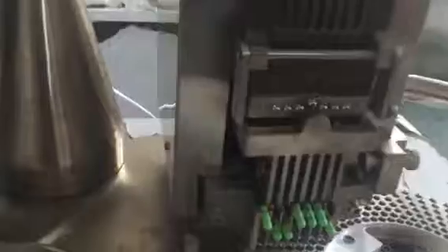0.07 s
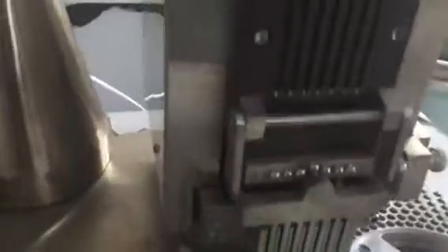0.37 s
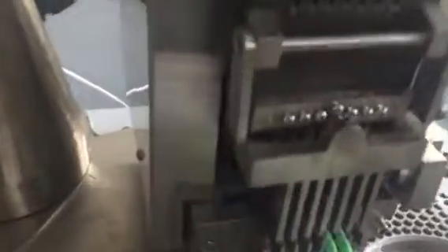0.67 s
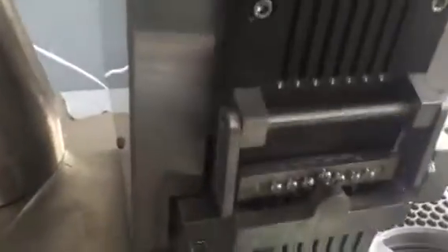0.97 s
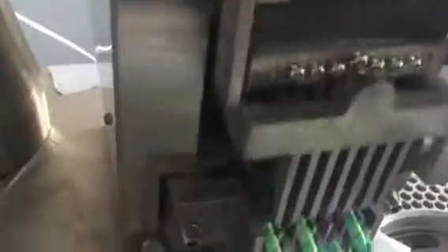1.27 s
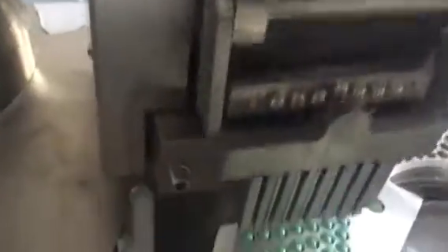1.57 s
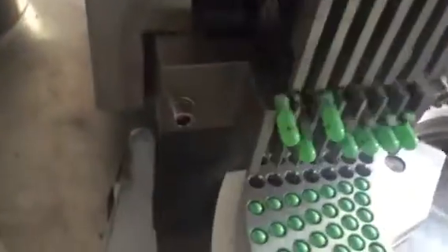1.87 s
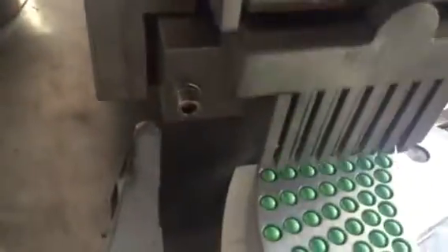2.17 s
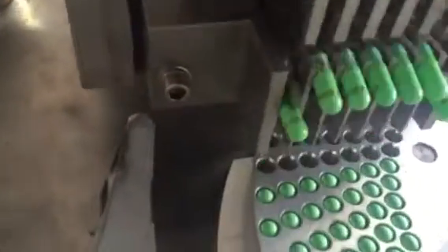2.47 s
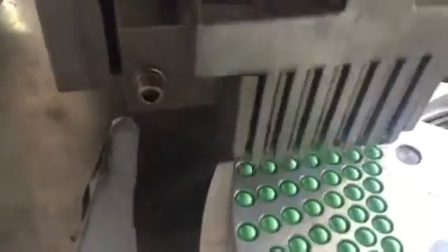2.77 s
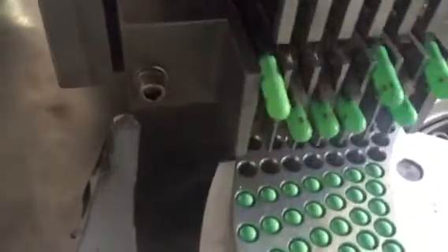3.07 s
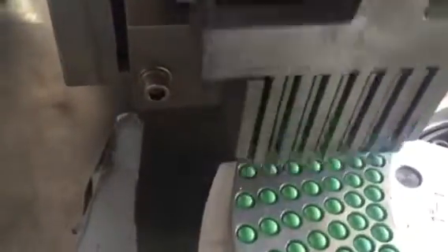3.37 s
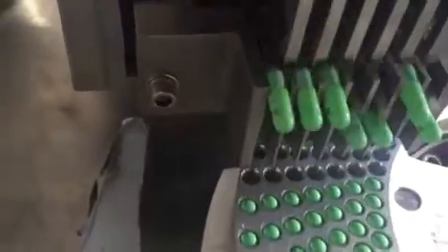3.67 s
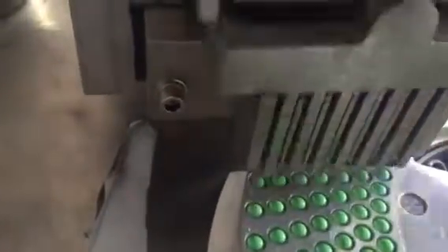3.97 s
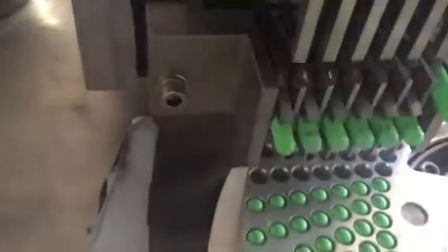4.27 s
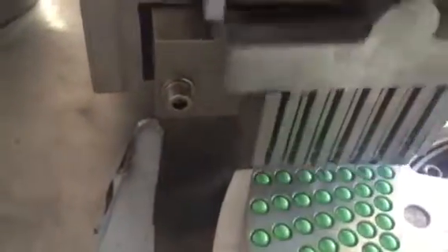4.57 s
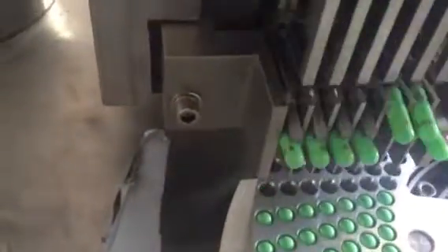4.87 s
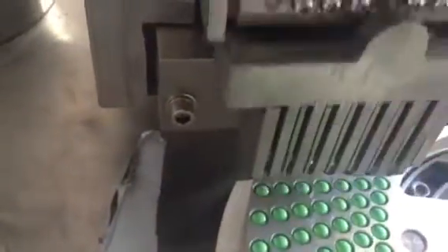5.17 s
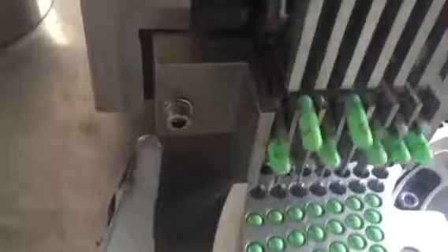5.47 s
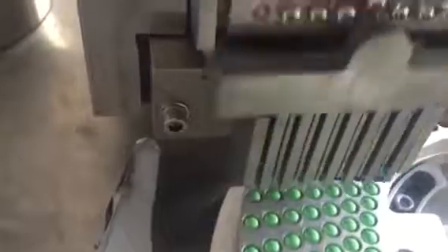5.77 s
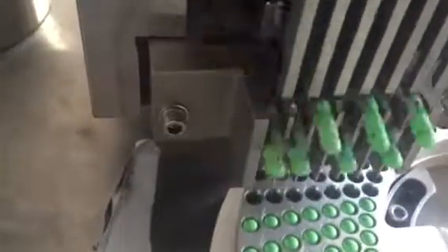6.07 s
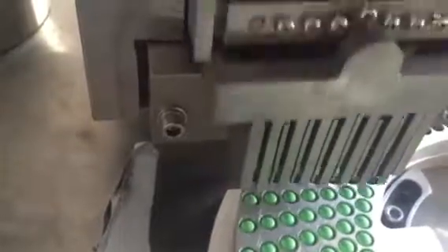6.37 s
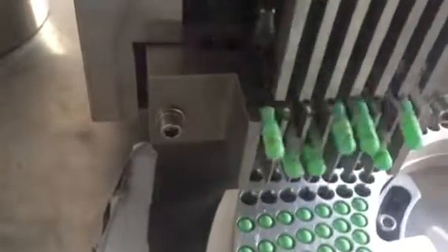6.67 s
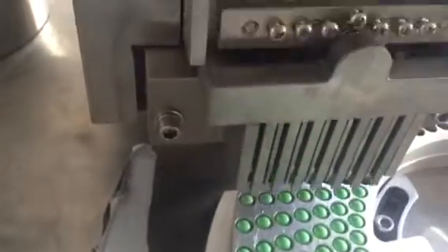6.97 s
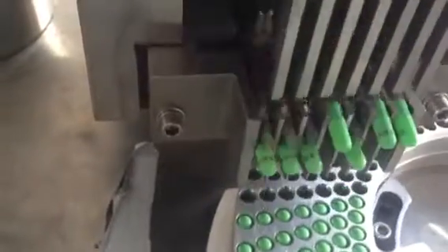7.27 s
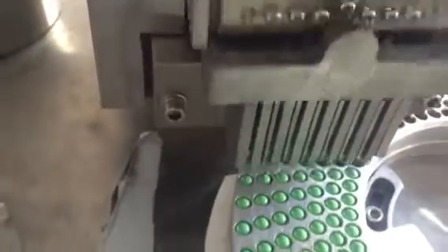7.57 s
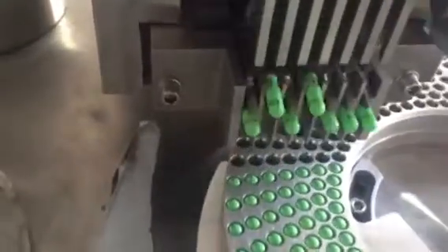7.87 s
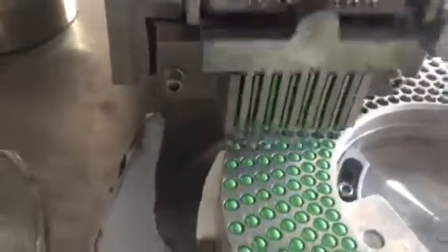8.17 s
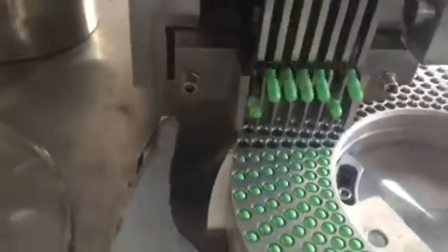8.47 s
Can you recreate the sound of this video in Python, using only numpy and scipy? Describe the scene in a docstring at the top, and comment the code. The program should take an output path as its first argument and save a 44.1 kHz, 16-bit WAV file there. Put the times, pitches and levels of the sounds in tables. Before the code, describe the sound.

Close rhythmic rushes of air, each cut off by a valve slap and steel clacks, as a capsule filling machine runs.

```python
"""Capsule filling machine

Close by in a workshop, about a hundred strokes a minute. Each stroke a vacuum valve opens with a
rush, air whistles in through the capsule plate, and the valve slaps shut with a gust that thumps
the microphone; the level often dips. The loading comb ticks, scrapes forward and clacks against its
stop. Loose capsules tap in their chutes. Underneath, the drive rumbles and the frame booms."""
import sys
import numpy as np
from scipy import signal
from scipy.fft import rfft, irfft
from scipy.io import wavfile
from scipy.ndimage import uniform_filter1d, minimum_filter1d, map_coordinates

SR = 44100
rng = np.random.default_rng(int(sys.argv[2]) if len(sys.argv) > 2 else 0)


def wav_record(signal):
    """Record a signal, one row per channel, as 16-bit PCM in the file named by sys.argv[1]."""
    frames = np.transpose(np.atleast_2d(signal))
    bounded = np.clip(frames, -1, 1)
    # unit amplitude maps onto the largest positive 16-bit level
    quanta = np.round(bounded * 32767).astype(np.int16)
    wavfile.write(sys.argv[1], SR, quanta)


N = 376613
TIME = np.arange(N) / SR


def from_db(db):
    return 10 ** (np.asarray(db) / 20)


def unit_rms(x):
    return x / np.sqrt(np.mean(x ** 2) + 1e-20)


def noise():
    return rng.standard_normal(N)


def drift(per_s):
    """Smooth random wander, spread about 1."""
    steps = rng.standard_normal(int(TIME[-1] * per_s) + 4)
    return map_coordinates(steps, [TIME[::64] * per_s + 1], order=3).repeat(64)[:N]


def hump(t, rise_s, fall_s):
    """Gaussian swell, height 1 at t = 0."""
    return np.exp(-.5 * (t / np.where(t < 0, rise_s, fall_s)) ** 2)


def bursts(starts_s, holds_s, levels_db, rise_s, fall_s):
    """Contact envelopes: rise, hold, decay."""
    out, t = np.zeros(N), TIME[:SR // 10]
    for start, hold, db in np.broadcast(starts_s, holds_s, levels_db):
        envelope = from_db(db) * (1 - np.exp(-t / rise_s)) * np.exp(-np.maximum(t - hold, 0) / fall_s)
        span = out[int(start * SR):][:len(t)]
        span += envelope[:len(span)]
    return out


def coloured(x, spectrum, size=4096):
    """Minimum-phase filter, unit power gain."""
    hz, level_db = np.transpose(spectrum)
    grid_hz = np.maximum(np.arange(size // 2 + 1) * SR / size, 1)
    gain = unit_rms(from_db(np.interp(np.log(grid_hz), np.log(hz), level_db)))
    cepstrum = irfft(np.log(gain))
    cepstrum[1:size // 2] *= 2
    cepstrum[size // 2 + 1:] = 0
    return signal.oaconvolve(x, irfft(np.exp(rfft(cepstrum))))[:N]


def resonate(x, hz, width_hz):
    """Two-pole resonance, peak gain 1."""
    r = np.exp(-np.pi * width_hz / SR)
    feedback = [1, -2 * r * np.cos(2 * np.pi * hz / SR), r * r]
    return signal.lfilter(np.array([1, 0, -1]) * (1 - r * r) / 2, feedback, x + 1e-18)


def steel_part(force, modes, vary_db, damping=0):
    """Modes ring in a drifting mix; contact damping widens each by a share of its pitch."""
    impulse = signal.unit_impulse(4096)
    out, response = 0, 0
    for k, (hz, width_hz, db) in enumerate(modes):
        gain = (-1) ** k * from_db(db)
        damped_hz = width_hz + damping * hz
        response += gain * resonate(impulse, hz, damped_hz)
        out += gain * resonate(force, hz, damped_hz) * from_db(vary_db * drift(2.056))
    return out / np.linalg.norm(response)


def grit(per_s, smooth_db):
    """Tiny random slips over smooth friction noise."""
    slips = unit_rms(noise() * (rng.random(N) < per_s / SR))
    return unit_rms(slips + from_db(smooth_db) * noise())


# Motor and pump tones: f/Hz, relative level/dB
DRIVE_TONES = [(100, -21), (128, -14.5), (195, -13), (360, -22), (507, -19), (650, -16), (1064, -21),
               (1600, -23)]
# Drive rumble: f/Hz, relative level/dB
DRIVE_SPECTRUM = [(25, -12), (60, 8.5), (110, 5.5), (190, -1), (300, -3.5), (430, -2.5), (650, 1),
                  (1000, 0.5), (1630, 5.5), (2000, 0.5), (4000, -2), (6000, -6.5), (9000, -11),
                  (15000, -17)]


def drive(gain_db=-32.5, rumble_db=-1, waver_rad=0.97):
    """Cams and pump rumble and hum, the tones wavering slightly."""
    hum = sum(from_db(db) * np.sqrt(2) * np.sin(2 * np.pi * hz * TIME + waver_rad * drift(8))
              for hz, db in DRIVE_TONES)
    rumble = from_db(rumble_db) * coloured(noise(), DRIVE_SPECTRUM)
    return from_db(gain_db) * (rumble + hum)


# Frame boom: f/Hz, relative level/dB
FRAME_SPECTRUM = [(25, -44), (55, -3.5), (85, -13.5), (135, -2.5), (175, -2), (215, -2), (330, -16),
                  (500, -20.5), (2000, -45)]
# Frame shudders: t/s, boom level/dB, lingering level/dB
FRAME_SHUDDERS = [(1.207, -19, -27.5), (4.22, -52, -35)]


def frame(dip_db, dip_ratio=4.1, steady_db=-36.5, rumble_db=-3, tone_hz=170, tone_db=-5, waver_rad=0.93):
    """The frame booms softly; each shudder swells the rumble and one unsteady low resonance."""
    swell = sum(from_db(boom_db) * hump(TIME - start, rise_s=0.024, fall_s=0.041)
                + from_db(linger_db) * hump(TIME - start, rise_s=0.024, fall_s=0.31)
                for start, boom_db, linger_db in FRAME_SHUDDERS)
    tone = np.sqrt(2) * np.sin(2 * np.pi * tone_hz * TIME + waver_rad * drift(39.9))
    rumble_gain = np.hypot(from_db(steady_db - dip_ratio * dip_db), from_db(rumble_db) * swell)
    return rumble_gain * coloured(noise(), FRAME_SPECTRUM) + from_db(tone_db) * swell * tone


# Air resonances of plate holes and duct: f/Hz, width/Hz, relative level/dB
DUCT_MODES = [(524, 240, -10.5), (715, 213, -5), (939.5, 103, 2), (1088, 106, -4.5), (1520, 960, -16),
              (1990, 374, -4), (2003, 1030, -9), (3170, 370, -3.5), (3430, 340, -3.5), (3837, 790, 1),
              (4540, 330, -5), (5255, 220, -6), (5670, 1280, -4), (6460, 690, -2), (7240, 1000, -9),
              (8270, 540, -6), (8740, 1100, -3), (9830, 800, -5.5), (10940, 650, -12.5),
              (12370, 2900, -9.5), (14200, 2400, -13), (15400, 2000, -16)]


def duct_air():
    """Turbulence excites each resonance independently."""
    return unit_rms(sum(from_db(db) * resonate(resonate(noise(), hz, width_hz), hz, width_hz)
                        for hz, width_hz, db in DUCT_MODES))


# Opening rush against steady draw: f/Hz, gain/dB
RUSH_EQ = [(100, 6), (900, -10), (1400, 0), (2000, 1), (2800, 2.5), (3900, -1), (6400, -6.5), (8800, -2.5),
           (15000, -17)]
# Duct buffeting: f/Hz, relative level/dB
BUFFET_SPECTRUM = [(25, -16), (60, 1), (90, -15), (130, -10), (200, 4.5), (250, -6.5), (320, -1),
                   (450, -7.5), (700, -21), (2000, -29)]
# Valve edge hiss: f/Hz, relative level/dB
EDGE_SPECTRUM = [(1000, -40), (4000, -39), (7000, 1.5), (8700, -12.5), (10500, -2.5), (13000, 0.5),
                 (15000, -4.5)]
# One row per cam turn: suction/dB, valve flutter/s, gust/dB, tick delay/s, scrape/dB, dip depth/dB
STROKES = [(-22, .0075, -8.5, .0485, -15, 0.3), (-21, 0.0099, -12, .050, -14, -2),
           (-20, .008, 1, .045, -15, 0.5), (-19, .0065, 14, 0.036, -13, 9.5),
           (-19.5, .0058, 1.5, 0.04, -12.5, 7.5), (-20, .0135, 10, .050, -13, 7),
           (-19, 0.00738, -6.5, .044, -13, 3.5), (-18, .0098, 8.5, .052, -13, 2),
           (-19.5, .0075, 11.5, 0.046, -12, 6.5), (-20, 0.0086, -29, .046, -14, 2.5),
           (-18, 0.0092, 9, .0507, -12, 2.5), (-19.5, 0.0073, -13, .0477, -16, 1.5),
           (-20, 0.0087, -12, .048, -16.5, 1.5), (-20, .013, 9.5, .052, -16.5, 3)]
SUCTION_DB, FLUTTER_S, GUST_DB, TICK_DELAY_S, SCRAPE_DB, DIP_DB = np.transpose(STROKES)
FIRST_SLAP_S, CYCLE_S, OPEN_S = 0.4295, 0.6066, 0.4209
SLAP_S = FIRST_SLAP_S + CYCLE_S * np.arange(len(STROKES))


def suction(rush_db=6.5, draw_db=-0.22, edge_db=-2, buffet_db=-19, leak_db=-13.5, shut_s=0.0048):
    """Stored vacuum empties in a rush, then the pump draws steadily until the valve shuts."""
    spit_at_s, draw_at_s, hiss_at_s, rush_at_s = 0.022, 0.074, 0.081, 0.082   # after opening
    draw_rise_s, tail_fall_s = 0.0088, 0.083
    rush, draw, edge = np.zeros((3, N))
    for slap, flutter, db in zip(SLAP_S, FLUTTER_S, SUCTION_DB):
        span = (TIME > slap - OPEN_S) & (TIME < slap + flutter + shut_s * 10)
        t = TIME[span] - slap + OPEN_S
        valve = from_db(db) * np.exp(-np.maximum(t - OPEN_S - flutter + shut_s, 0) / shut_s)
        opened = 1 / (1 + np.exp((draw_at_s - t) / draw_rise_s))
        leak = from_db(leak_db) * np.minimum(t / spit_at_s, 1)
        rush[span] += valve * hump(t - rush_at_s, rise_s=0.017, fall_s=0.038)
        draw[span] += valve * np.maximum(opened, leak)
        # The edge spits as the seal cracks, hisses with the rush, dies away.
        spit = from_db(-6) * hump(t - spit_at_s, rise_s=0.0062, fall_s=0.0062)
        hiss = from_db(4) * hump(t - hiss_at_s, rise_s=0.017, fall_s=0.017)
        tail = from_db(3) * opened * np.exp((hiss_at_s - t) / tail_fall_s)
        edge[span] += valve * (spit + hiss + tail)
    air = duct_air()
    rush_air = from_db(rush_db) * unit_rms(coloured(air[::-1], RUSH_EQ))   # reversed to decorrelate
    draw_air = from_db(draw_db) * air + from_db(buffet_db) * coloured(noise(), BUFFET_SPECTRUM)
    edge_air = from_db(edge_db + 0.6 * drift(2.97)) * coloured(noise(), EDGE_SPECTRUM)
    return draw * draw_air + rush * rush_air + edge * edge_air


def panel_echoes(x, count=8, echo_db=-22):
    """Short echoes off nearby steel come and go as the hand holding the microphone moves."""
    lags = rng.integers(SR // 1000, SR // 130, count)
    return x + sum(from_db(echo_db) * drift(2.09) * np.pad(x, (lag, 0))[:N] for lag in lags)


def workshop(x, t60_s=0.15, predelay_s=0.003, cutoff_hz=5000):
    """Dense dull reflections from panels and walls."""
    t = TIME[:SR // 2]
    tail = rng.standard_normal(len(t)) * from_db(-60 * t / t60_s) * (t > predelay_s)
    tail = signal.sosfilt(signal.butter(1, cutoff_hz, fs=SR, output="sos"), tail)
    return signal.oaconvolve(x, tail / np.linalg.norm(tail))[:N]


def narrowing_hiss(gain_db=-5.5, centre_hz=8850, half_width_hz=600, climb_hz_per_s=6000):
    """Late in each stroke the air path narrows: a thin band of hiss swells and climbs."""
    lead_s = 0.059
    level, pitch_hz = np.zeros((2, N))
    for slap, db in zip(SLAP_S, SUCTION_DB):
        span = (TIME > slap - OPEN_S) & (TIME < slap)
        t = TIME[span] - (slap - lead_s)
        level[span] = from_db(gain_db + db) * hump(t, rise_s=0.043, fall_s=0.043)
        pitch_hz[span] = centre_hz + climb_hz_per_s * t
    lowpass = signal.butter(2, half_width_hz, fs=SR, output="sos")
    baseband = unit_rms(signal.sosfilt(lowpass, [noise(), noise()]))
    phase = 2 * np.pi * np.cumsum(pitch_hz) / SR
    return level * (baseband[0] * np.cos(phase) + baseband[1] * np.sin(phase))


# Seal on valve seat: f/Hz, relative level/dB
SLAP_SPECTRUM = [(60, -7.5), (250, 4), (600, 1), (1000, 2.5), (1450, 1), (2200, 4), (2700, -3), (3600, 0),
                 (4900, -6.5), (6400, -4.5), (7600, -8), (8700, -4.5), (10500, -10), (15000, -13.5)]


def valve_slaps(brush_lead_s=0.0141, slap_db=-9, gust_share=0.077):
    """The seal brushes its seat, then flutters shut, harder with a strong gust; the block rings."""
    brush = bursts(SLAP_S - brush_lead_s, holds_s=0.0042, levels_db=-20, rise_s=0.00048, fall_s=0.0013)
    slap = bursts(SLAP_S, FLUTTER_S, slap_db + gust_share * GUST_DB, rise_s=0.00025, fall_s=0.0012)
    contact = (brush + slap) * coloured(noise(), SLAP_SPECTRUM)
    lower_ring = from_db(-5) * resonate(contact, hz=2250, width_hz=130)
    upper_ring = from_db(-14) * resonate(contact, hz=2560, width_hz=130)
    return contact + lower_ring + upper_ring


def gusts(lead_s=0.00344, low_cut_hz=49, damping=1.15, stages=4):
    """The seating valve emits one pressure push; the microphone's bass cut makes it a falling thump."""
    pressure = 2 * bursts(SLAP_S + FLUTTER_S - lead_s, 0, GUST_DB, rise_s=0.00024, fall_s=0.00081)
    w = 2 * np.pi * low_cut_hz
    highpass = signal.bilinear([1, 0, 0], [1, damping * w, w * w], SR)
    for _ in range(stages):
        pressure = signal.lfilter(*highpass, pressure + 1e-18)
    return pressure


def level_dips(onset_s=0.008, brief_s=0.26, linger_share=0.59, linger_s=1.24):
    """Depth in dB of the dip after a slap; recovery is quick at first, then slow."""
    depth_db = np.zeros(N)
    for slap, flutter, db in zip(SLAP_S, FLUTTER_S, DIP_DB):
        t = np.maximum(TIME - slap - flutter, 0)
        onset = np.minimum(t / onset_s, 1)
        brief = np.exp(-(t / brief_s) ** 6)
        lingering = linger_share * np.exp(-t / linger_s)
        depth_db = np.maximum(depth_db, db * onset * np.maximum(brief, lingering))
    return depth_db


# Loading comb modes: f/Hz, width/Hz, relative level/dB
COMB_MODES = [(1350, 67, -1), (1640, 87, 1), (1960, 250, 1.5), (2680, 2000, -4.5), (3490, 690, 5),
              (3960, 180, 6.5), (4200, 260, 0), (4970, 1500, -0.5), (5780, 750, 5), (6870, 630, -6.5),
              (8100, 690, -9), (13780, 9700, -24)]


def comb(slide_delay_s=0.054, slide_s=0.0057):
    """A tick as the play is taken up, then a short gritty slide."""
    tick = bursts(SLAP_S + TICK_DELAY_S, holds_s=0.0014, levels_db=-14.5, rise_s=0.00012, fall_s=0.0021)
    slide = bursts(SLAP_S + slide_delay_s, slide_s, SCRAPE_DB, rise_s=0.0003, fall_s=0.0055)
    force = tick * noise() + slide * grit(per_s=5000, smooth_db=-8)
    return steel_part(force, COMB_MODES, vary_db=3)


# Carriage modes: f/Hz, width/Hz, relative level/dB
CARRIAGE_MODES = [(213, 13, -6), (317, 21, 0), (645, 58, -13), (1292, 22, -2.5), (1614, 52, 4.5),
                  (1880, 111, -4.5), (2590, 106, -3.5), (3025, 47, 1), (3540, 310, -4), (4350, 140, -4.5),
                  (5070, 23, -5), (5600, 450, -17), (6270, 200, -12), (7130, 61, -7), (8900, 450, -9.5),
                  (9550, 230, -9), (12300, 280, -12), (13670, 48, -26), (16400, 162, -22)]


def carriage(delay_s=0.1066, contact_s=0.0011):
    """Hard knock and bright crack on the stop; loose parts chatter, one plate buzzes on."""
    stops_s = SLAP_S + delay_s
    knock = bursts(stops_s, contact_s, levels_db=-12, rise_s=0.0001, fall_s=0.0045)
    chatter = bursts(stops_s, contact_s, levels_db=-19, rise_s=0.0012, fall_s=0.009)
    crack = bursts(stops_s, contact_s, levels_db=-17.5, rise_s=0.0001, fall_s=0.0016) * noise()
    buzz = bursts(stops_s, holds_s=0.073, levels_db=-21, rise_s=0.02, fall_s=0.016) * noise()
    force = knock * noise() + chatter * grit(per_s=1300, smooth_db=-10)
    rattle = steel_part(force, CARRIAGE_MODES, vary_db=2, damping=0.013)
    return crack + rattle + resonate(buzz, hz=1630, width_hz=130)


# Loudest capsule taps: t/s, relative level/dB
LOUD_TAPS = [(1.2072, -19.5), (1.8446, -23), (3.067, -12), (4.7671, -14), (4.8794, -20), (8.517, -17)]
# Capsule shell: f/Hz, relative level/dB
SHELL_SPECTRUM = [(500, -24), (1500, -9), (2500, -4), (3700, -7), (5800, 3), (8000, -14.5), (15000, -9)]


def capsules(gain_db=-6, contact_s=0.0008, faint_per_stroke=2, faint_db=-22, spread_db=1.5):
    """Light shells tap drily in their chutes; faint taps fall at random after each slap."""
    delay_range_s = (0.08, 0.22)
    faint = [(slap + rng.uniform(*delay_range_s), rng.normal(faint_db, spread_db))
             for slap in np.repeat(SLAP_S, faint_per_stroke)]
    starts_s, levels_db = np.transpose(list(LOUD_TAPS) + faint)
    taps = bursts(starts_s, contact_s, levels_db, rise_s=0.0001, fall_s=0.0032)
    return from_db(gain_db) * taps * coloured(noise(), SHELL_SPECTRUM)


def scene(room_db=-24):
    """Close, nearly dry, both channels alike. Slaps and gusts bypass the dips."""
    dip_db = level_dips()
    dip_gain = from_db(-dip_db)
    machine = valve_slaps()
    machine += dip_gain * (panel_echoes(suction()) + narrowing_hiss() + comb() + carriage() + capsules())
    room = from_db(room_db) * workshop(machine)
    mix = machine + room + dip_gain * drive() + frame(dip_db) + gusts()
    return np.array([mix, mix])


def record(dry, threshold=0.9, ceiling=0.76, cutoff_hz=15900):
    """Fast limiter on the thumps, soft clip, steep low-pass."""
    window = SR // 1500
    gain = threshold / np.maximum(np.abs(dry), threshold)
    limited = dry * uniform_filter1d(minimum_filter1d(gain, window), window)
    clipped = limited / (1 + (limited / ceiling) ** 8) ** (1 / 8)
    return signal.sosfilt(signal.ellip(12, .1, 80, cutoff_hz, fs=SR, output="sos"), clipped)


dry = scene()
out = record(dry)
wav_record(out)
```